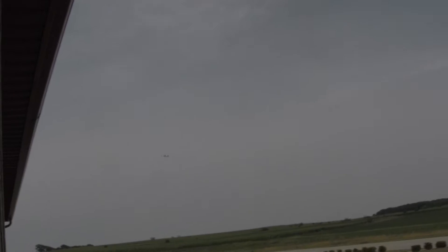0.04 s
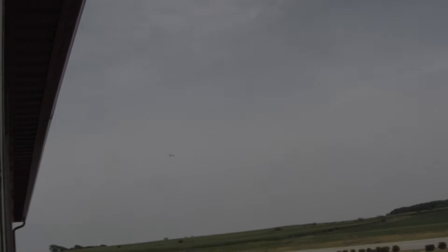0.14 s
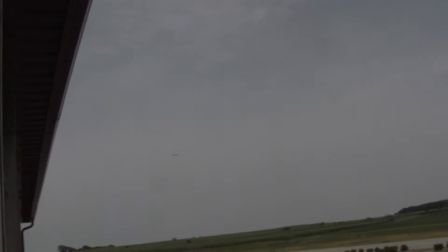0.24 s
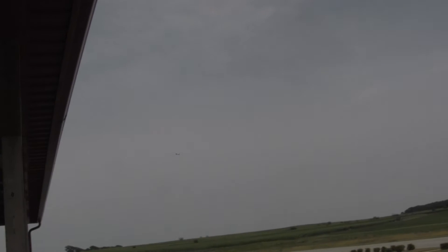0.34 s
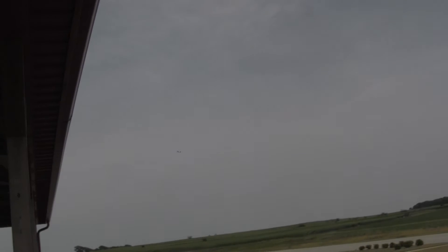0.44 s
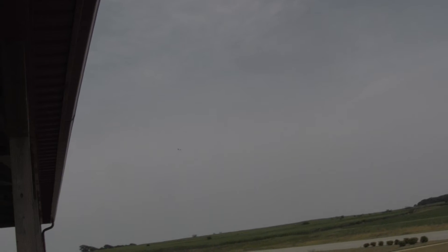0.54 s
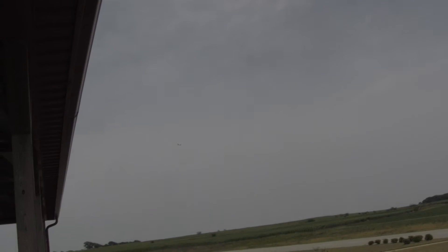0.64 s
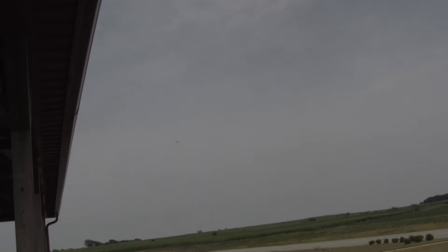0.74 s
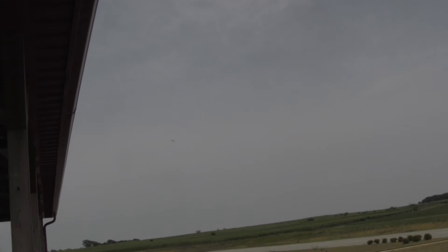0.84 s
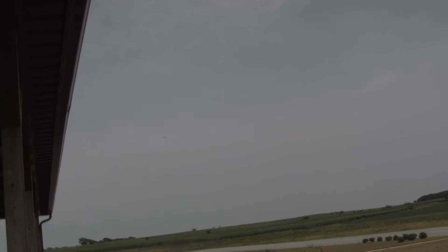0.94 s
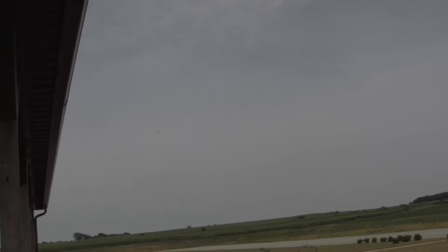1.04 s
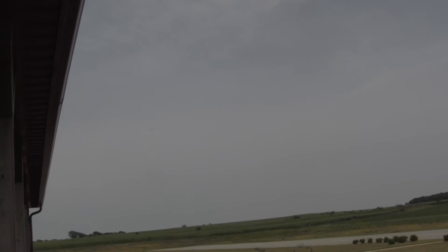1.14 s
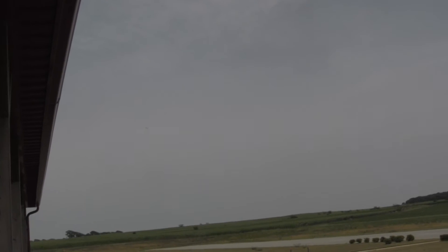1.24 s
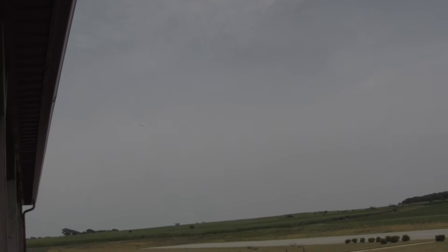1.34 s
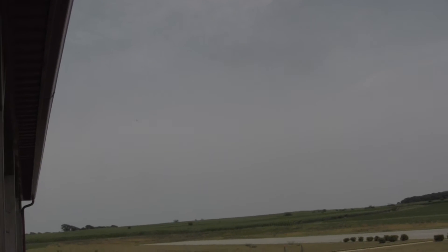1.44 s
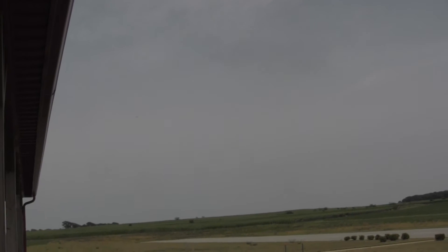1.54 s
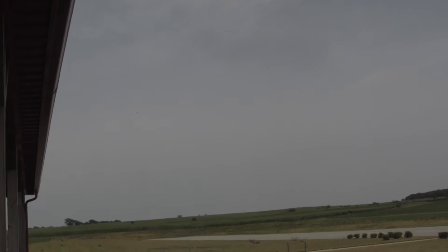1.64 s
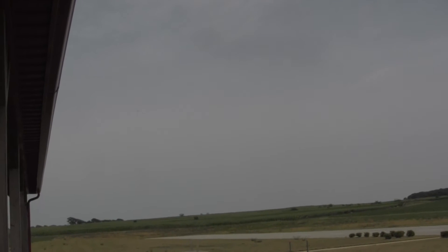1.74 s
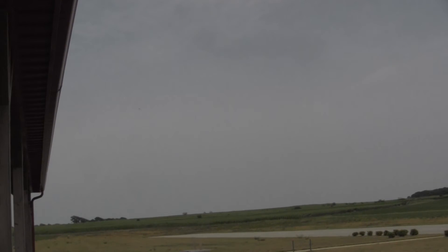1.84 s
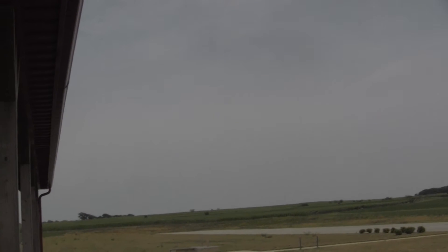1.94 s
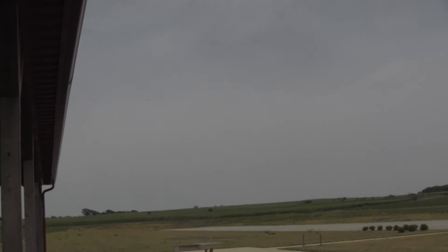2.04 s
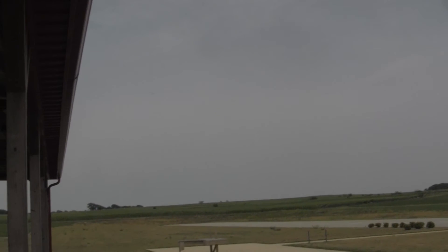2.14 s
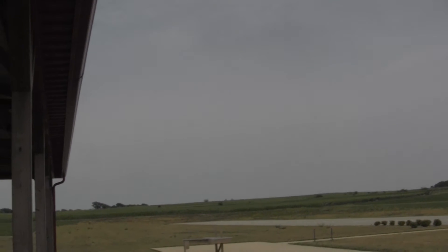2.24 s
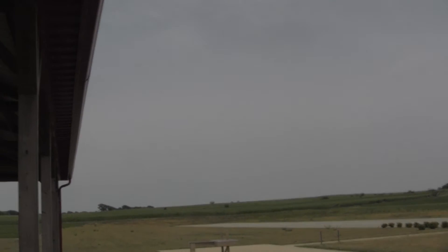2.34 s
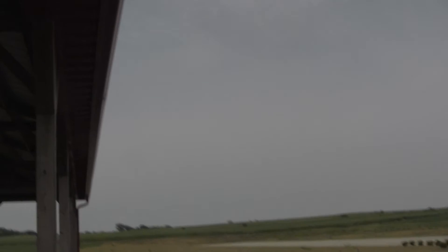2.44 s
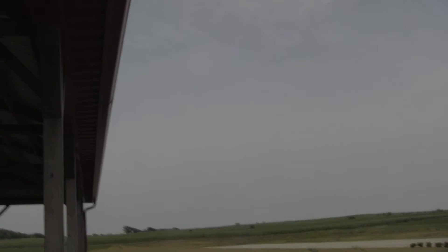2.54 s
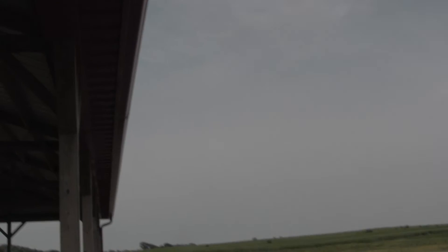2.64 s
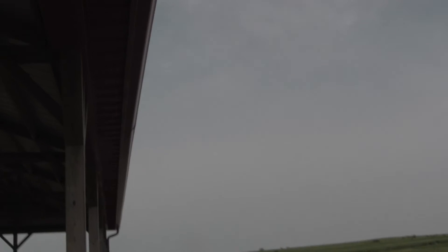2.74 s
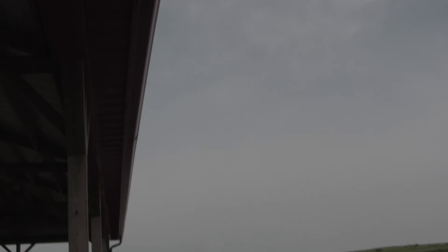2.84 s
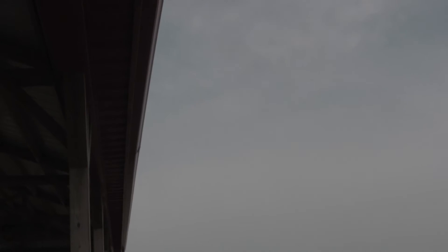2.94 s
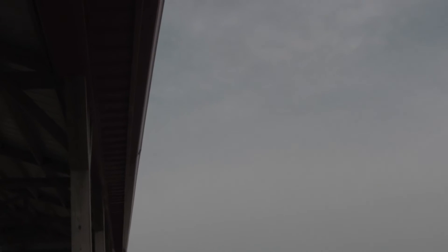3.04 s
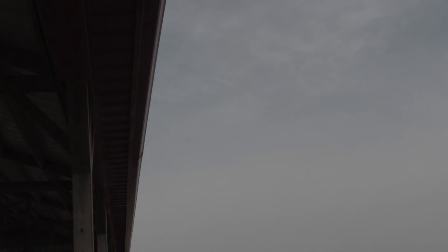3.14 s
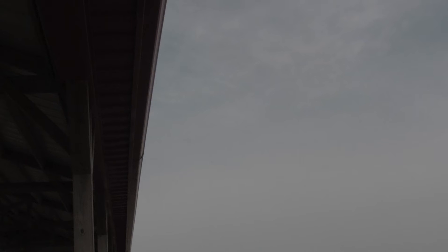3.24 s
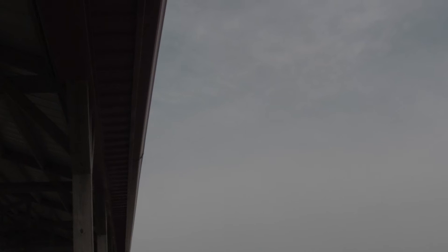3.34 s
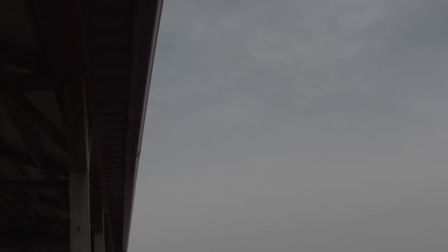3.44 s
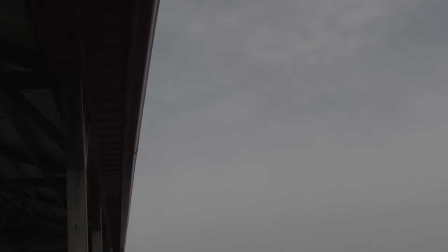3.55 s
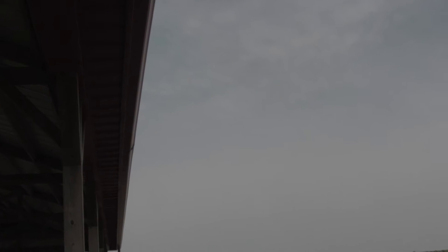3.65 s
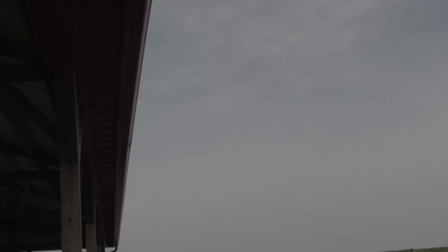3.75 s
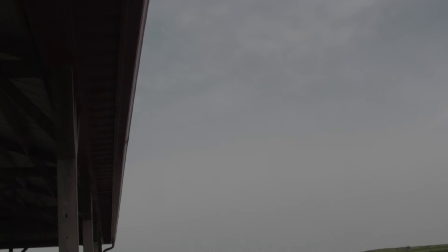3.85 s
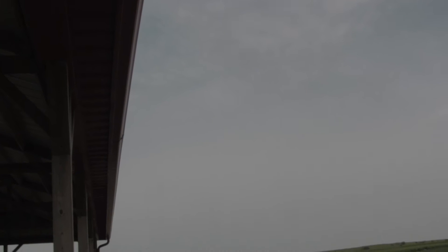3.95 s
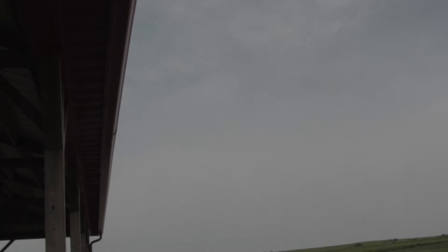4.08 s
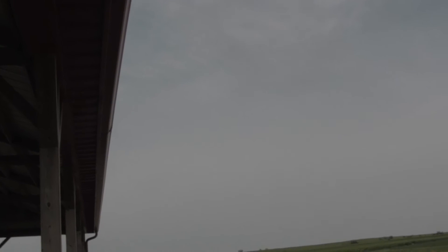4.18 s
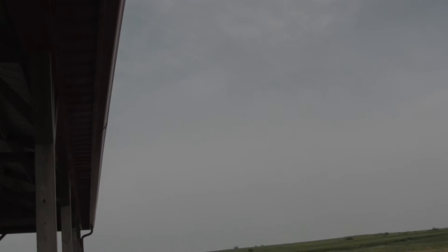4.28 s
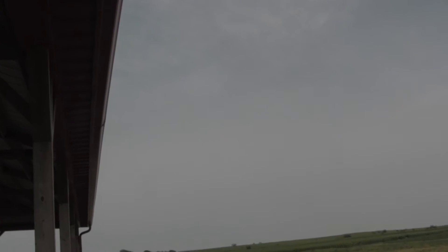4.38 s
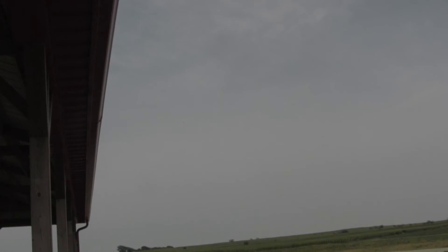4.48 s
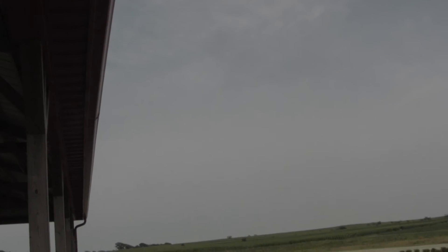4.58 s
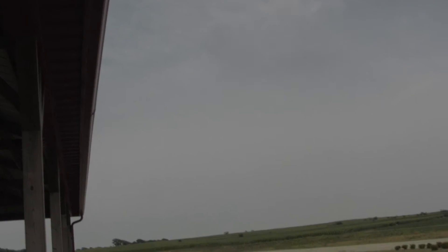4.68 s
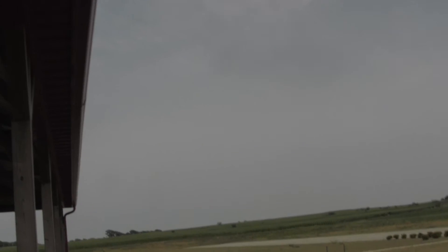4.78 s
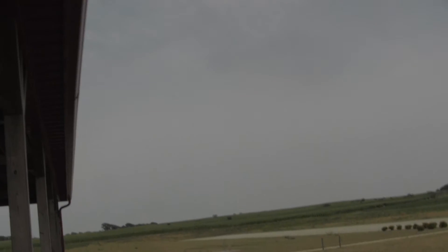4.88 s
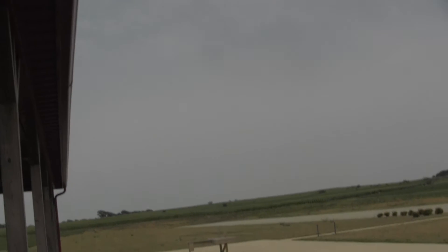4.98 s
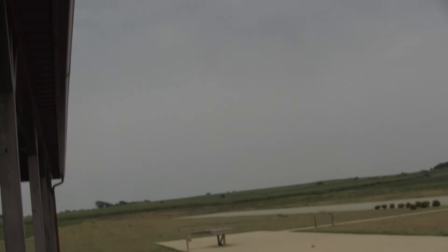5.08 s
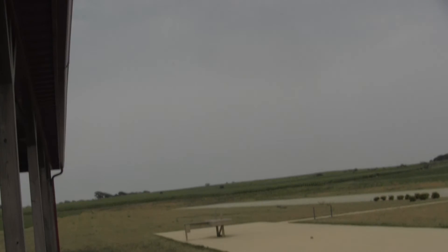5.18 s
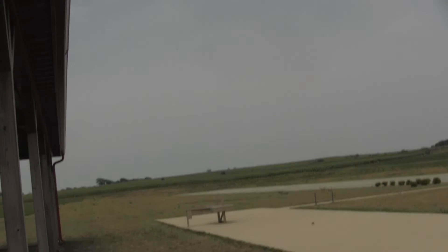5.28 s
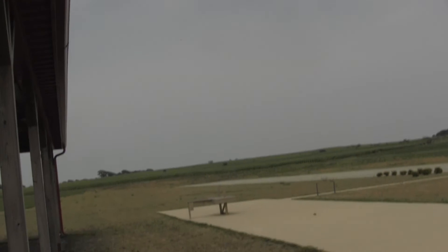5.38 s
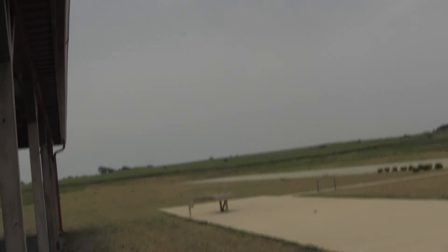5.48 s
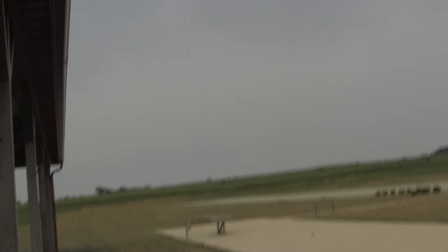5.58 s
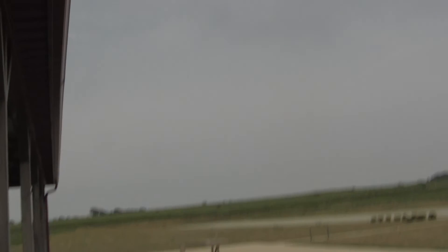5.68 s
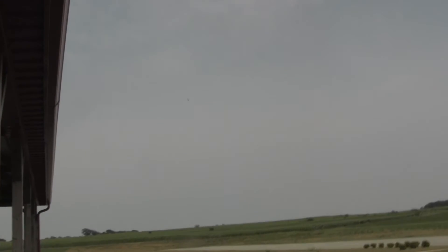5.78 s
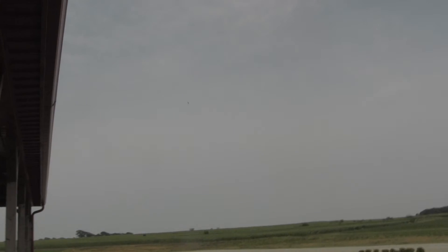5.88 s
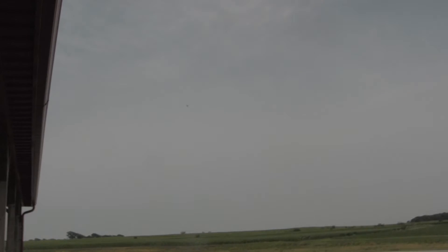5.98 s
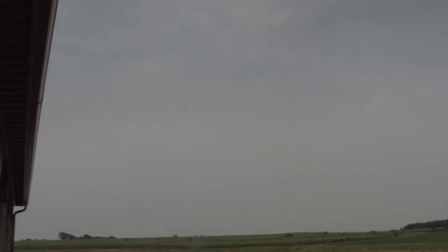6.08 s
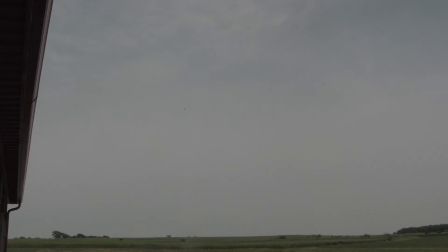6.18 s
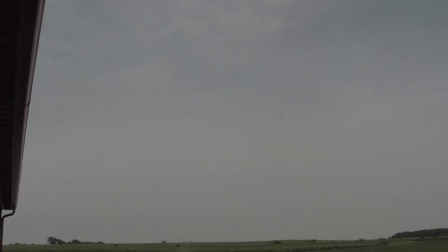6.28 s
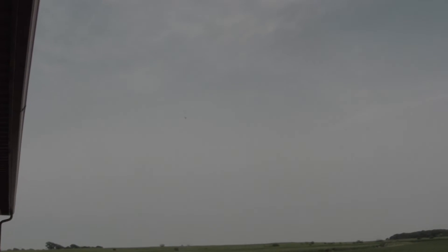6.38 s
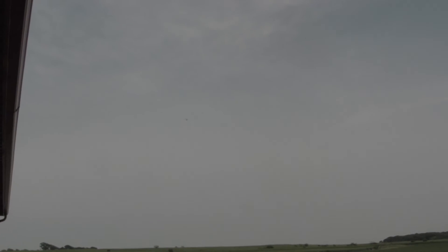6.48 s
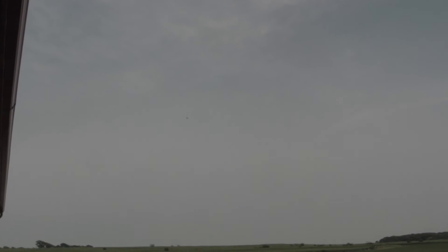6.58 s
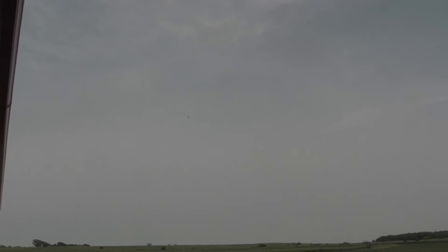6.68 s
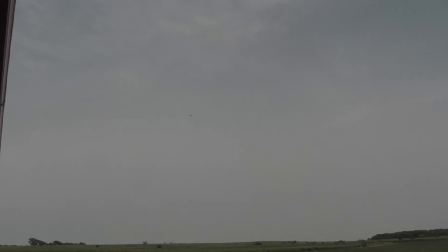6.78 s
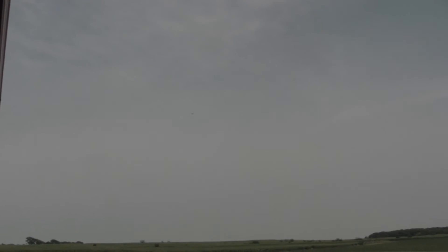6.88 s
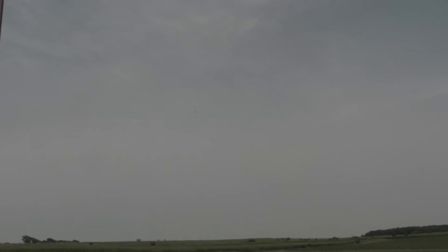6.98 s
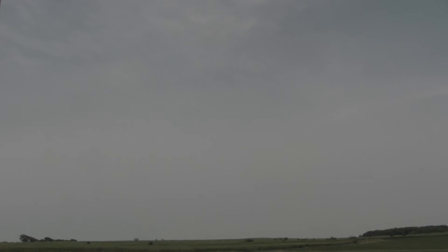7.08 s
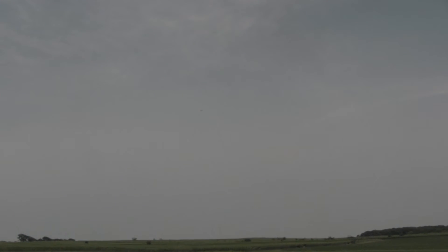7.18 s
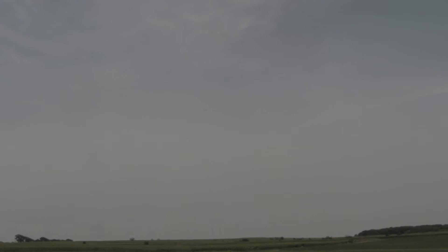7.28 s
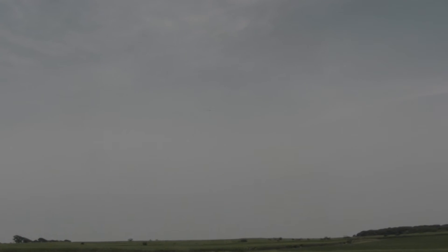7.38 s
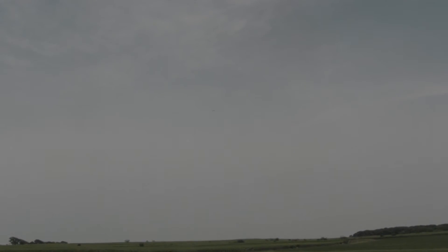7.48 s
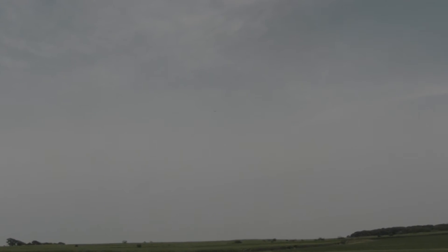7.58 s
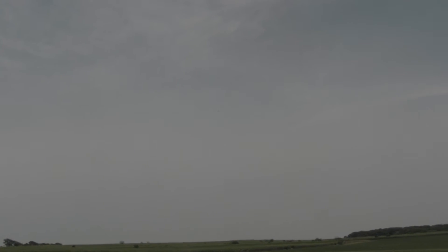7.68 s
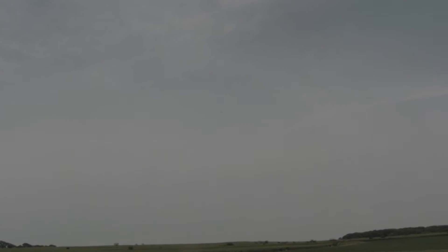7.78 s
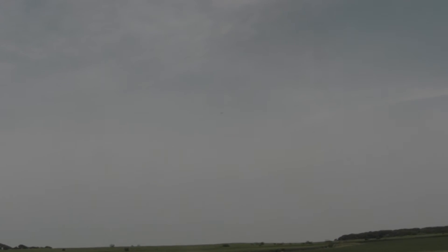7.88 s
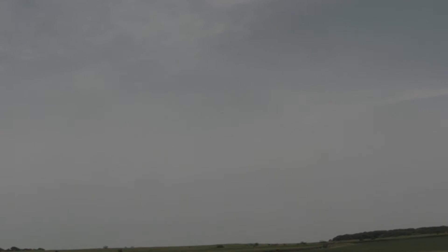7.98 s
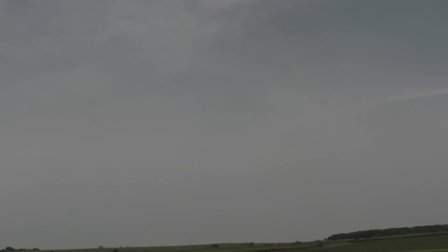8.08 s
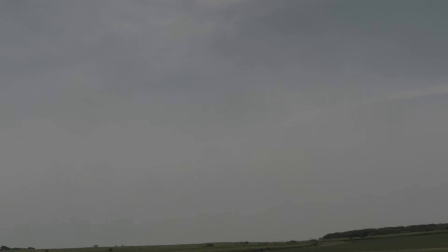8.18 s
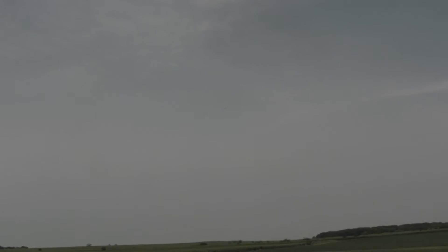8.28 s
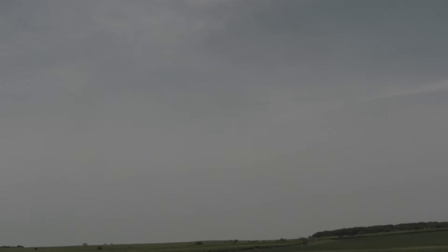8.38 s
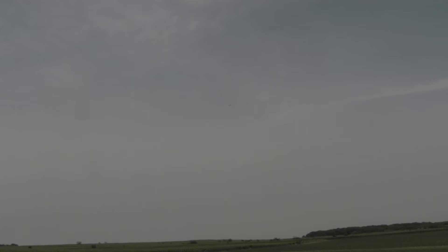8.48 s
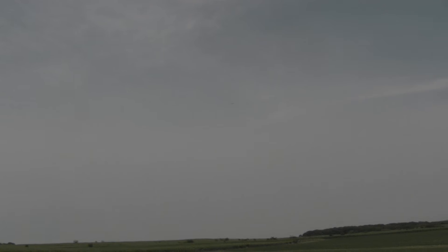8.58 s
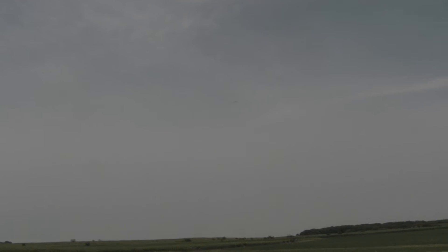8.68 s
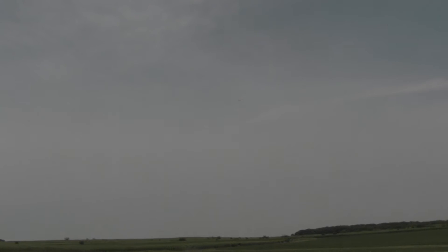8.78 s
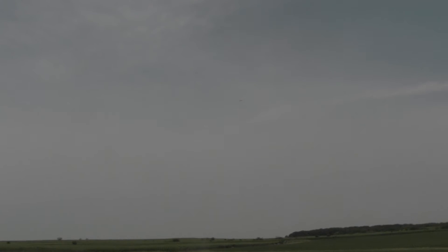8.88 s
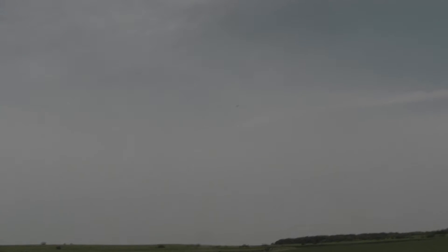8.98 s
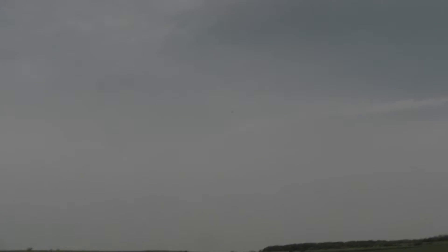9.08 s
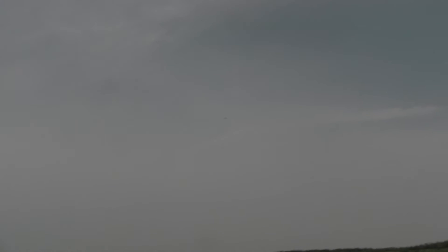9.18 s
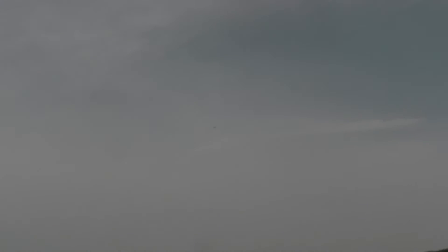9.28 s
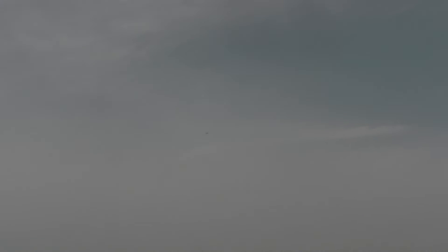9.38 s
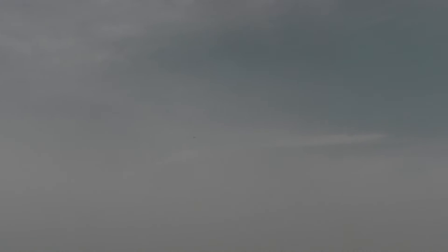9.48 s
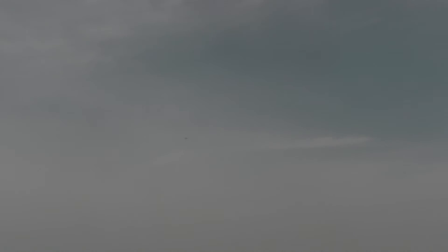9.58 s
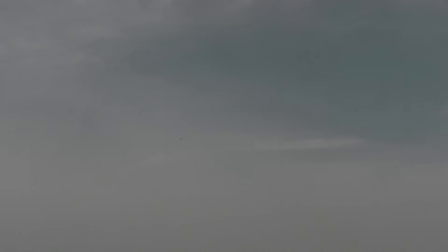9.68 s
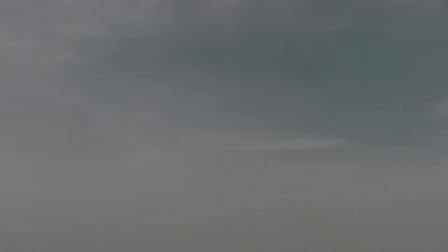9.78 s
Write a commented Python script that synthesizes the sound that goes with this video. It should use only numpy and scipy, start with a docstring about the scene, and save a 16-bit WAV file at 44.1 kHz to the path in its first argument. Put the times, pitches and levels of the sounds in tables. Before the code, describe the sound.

A model jet roars and whines close by, sinking in pitch as it recedes, while light wind buffets the microphone and faint camera ticks follow.

```python
"""A model jet climbs away over an airfield, heard from the edge of an open wooden shelter.
First its exhaust roars close by: noise through tailpipe resonances that sink, beside a whine that also sinks.
Wind eddies, made as short noise and vortex knocks, buffet the microphone; moving air swells and dips the treble.
From halfway, dry noise ticks come from the hand-held camera amid thin patches of grainy hiss; the fading whine
climbs with the throttle over a lower shaft tone, and the image opens to the right. A faint hiss runs throughout."""
import sys
import numpy as np
from scipy import signal
from scipy.fft import rfft, irfft, next_fast_len
from scipy.io import wavfile

SR = 44100
rng = np.random.default_rng(int(sys.argv[2]) if len(sys.argv) > 2 else 0)


def to_wav(sig):
    """Store sig (one row per channel, or 1-D mono) as 16-bit WAV at the path in sys.argv[1].

    Samples outside -1..1 are clipped; the rate is SR.
    """
    pcm = np.clip(np.atleast_2d(sig), -1, 1) * 32767
    pcm = np.round(pcm).astype(np.int16)
    wavfile.write(sys.argv[1], SR, pcm.T)  # frames by channels


N = 433503  # samples
CUTOFF_HZ = 15300
FRAME, HOP = 1024, 256  # short-time analysis, samples
TIME = np.arange(N) / SR
FRAME_S = np.arange(N // HOP + 2) * HOP / SR
BIN_HZ = np.maximum(np.arange(FRAME // 2 + 1) * SR / FRAME, 1)[:, None]
ABSORBED_ABOVE_HZ = 1640
NEAR_UNTIL_S, NEAR_FADE_S = 0.5, 0.79

# Breeze on the microphone. Each row: time in seconds, level in dB.
BREEZE_LEVEL = [(0, -41), (.45, -52), (.9, -54), (1.5, -72), (2.22, -50.5), (2.45, -68), (3.0, -66.5),
                (3.35, -61), (4.4, -60), (4.82, -46.5), (5.3, -67.5), (5.95, -48), (6.25, -58.5),
                (8.05, -53.5), (8.55, -51), (8.9, -61), (9.33, -47.5), (9.83, -51)]
# Spectrum of the breeze. Each row: frequency in Hz, relative level in dB.
BREEZE_COLOUR = [(20, -34), (45, -17), (70, -5), (110, 0.5), (180, 0.5), (280, -7.5), (450, -32),
                 (800, -30), (2000, -65)]
# Single eddies. Each row: middle in seconds, length in seconds, rms in dB before the last high-pass.
BUFFETS = [(.01, 0.036, -33), (0.165, 0.027, -34), (0.235, 0.045, -23.5), (0.411, 0.039, -34),
           (1.187, 0.0363, -42), (2.284, 0.022, -41), (3.434, 0.014, -38.5), (4.033, 0.037, -46),
           (4.565, 0.0095, -34), (4.58, 0.016, -34), (4.668, 0.024, -45), (4.694, .013, -37),
           (4.708, 0.009, -34), (4.718, 0.014, -30), (4.747, 0.0084, -29.5), (4.832, 0.0079, -28),
           (4.844, .014, -32), (4.893, 0.012, -44), (5.744, 0.036, -42.5), (5.841, 0.011, -33.5),
           (5.871, 0.031, -38.5), (6.094, 0.02, -35), (6.12, 0.018, -35.5), (7.47, 0.027, -46),
           (8.111, 0.026, -47), (8.255, 0.022, -45), (8.422, 0.024, -42), (8.699, 0.016, -39.5),
           (8.929, 0.013, -41), (9.193, 0.019, -42.5), (9.429, 0.16, -48.5), (9.524, 0.018, -37)]
# Gusts, short or long, shedding vortices. Each row: middle in seconds, length in seconds,
# vortices per second, top of the band in Hz, rms in dB before the last low-pass.
SHUDDERS = [(4.815, 0.026, 250, 510, -28.5), (5.82, .16, 170, 320, -48), (6.03, .23, 170, 320, -42.5),
            (8.531, 0.3, 207, 362, -47.5)]
# Ticks of the camera body. Each row: start in seconds, nominal level in dB.
TICKS = [(4.545, -39), (4.587, -37), (4.91, -46), (5.315, -47), (5.392, -43), (5.465, -42), (5.5, -42),
         (5.566, -42), (5.598, -35), (5.62, -39), (5.63, -42), (5.655, -47), (5.71, -48), (6.66, -38)]
# Faint, thin patches of grainy high hiss.
# Each row: middle in seconds, spread in seconds, rms at the crest in dB.
HISS_PATCHES = [(4.9, .015, -63), (5.47, 0.045, -58), (5.63, .04, -66), (6.05, .14, -65),
                (6.65, 0.027, -59.5)]
# Stereo image: mono below a corner, leaning right above it.
# Each row: time in seconds, corner in Hz, extra width in the low mids from 0 to 1.
STEREO_SPREAD = [(.5, 1900, 0.55), (.7, 4520, 0), (2.4, 4240, 0), (3.1, 2600, 0.1), (4.6, 1450, 0.14),
                 (5.9, 1400, 0.14), (6.4, 1100, 0.33), (7.3, 710, 0.5), (7.8, 506, 0.57), (8.2, 335.2, 0.9),
                 (9.83, 232, .9)]
# Pitch of the compressor whine. Each row: time in seconds, frequency in Hz.
WHINE_PITCH = [(0, 11165), (.55, 11100), (.75, 11050), (1.1, 10825), (1.3, 10620), (1.5, 10380),
               (1.7, 10200), (2.05, 9860), (2.5, 9365), (2.8, 9130), (3.1, 9020), (3.55, 8885),
               (5.27, 8900), (5.7, 9194), (5.9, 9323), (6.3, 9453), (6.9, 9485), (8.2, 9812), (9.83, 10627)]
# The whine beams forwards and fades as the jet turns.
# Each row: time in seconds, level in dB before swells, fading and an overall offset.
WHINE_LEVEL = [(0, -39), (.35, -47), (.68, -35), (.9, -45), (1.05, -41), (1.16, -57), (1.45, -46),
               (1.62, -50.5), (1.71, -59), (1.8, -47), (1.92, -54), (2.3, -57), (2.5, -50.5), (2.7, -54),
               (2.92, -60), (3.35, -65), (4.2, -72), (4.7, -71.5), (5.3, -80), (5.7, -75), (5.9, -81),
               (6.15, -74), (6.5, -67), (7.1, -87), (9.83, -101)]
# Moving air bends the sound towards the listener or away. Each row: middle in seconds, spread in seconds,
# centre in Hz, spread in octaves, change in dB.
SWELLS = [(.1, 0.019, 10000, 0.44, 4.5), (.73, 0.066, 7760, 0.37, 7.5), (1.07, 0.05, 7300, 0.42, 3.5),
          (1.18, 0.044, 7000, 1, -3), (1.53, 0.06, 6750, 0.84, 5.5), (.68, 0.15, 5850, .04, -3),
          (1.66, 0.061, 7000, 0.2, 4), (1.8, .08, 2800, .12, 6), (2.08, 0.075, 10000, .25, 5),
          (2.5, 0.19, 9300, 0.22, 3), (3.6, 0.63, 3840, 0.033, -7), (3.95, .45, 6330, .04, -2),
          (1.9, 0.2, 3480, 0.07, 5), (1.88, 0.11, 3130, 0.33, 1.5), (2.06, 0.076, 6240, 0.82, 4.5),
          (2.6, .25, 2850, .05, -8), (2.97, 0.1, 9350, 0.19, 14.5), (2.95, .08, 2480, 0.11, 6),
          (3.7, 0.24, 5000, 0.52, 9.5), (4.2, 0.15, 5270, 0.33, 7.5), (4.58, 0.12, 7000, 0.1, -5),
          (5.1, 0.15, 2000, 0.27, 6.5), (5.12, .13, 2030, .06, 2.5), (6.98, 0.045, 2520, .08, 4),
          (9.0, 0.84, 1970, .06, -2.5), (9.7, 0.14, 2580, 0.066, 4), (8.2, .6, 4570, .02, 3.5),
          (5.21, 0.096, 3480, 0.36, -4.5), (5.85, 0.12, 4070, 0.51, -6.5), (6.31, 0.1, 4900, 1.08, 10),
          (6.31, .07, 3170, 0.1, -0.5), (6.1, 0.049, 7000, .3, -7.5), (6.4, .4, 2680, 0.085, -7),
          (6.5, 0.072, 2060, 0.5, -4), (6.68, 0.04, 3180, 0.13, 12.5), (6.78, 0.042, 3500, 1.1, 5),
          (7.02, 0.037, 3500, 0.42, -3.5), (7.15, 0.023, 6000, 1.3, 4.5), (7.25, 0.034, 1840, 0.33, 7),
          (7.38, .03, 3300, .5, 0.5), (7.66, 0.094, 6000, 0.93, 10), (7.79, 0.033, 3270, .5, -2.5),
          (8.025, 0.056, 5000, 1.2, 13.5), (8.145, 0.028, 3800, 0.86, 9), (8.32, 0.041, 4500, 0.51, 3.5),
          (8.62, 0.015, 6500, 0.75, 10), (8.76, 0.048, 5970, 1.3, 9), (9.1, 0.087, 6000, .6, 4),
          (9.31, .02, 5000, .8, -3), (9.37, .018, 6500, 0.45, 0), (9.42, .015, 6500, .5, -7),
          (9.55, 0.12, 4460, 0.82, 6), (9.77, .025, 6500, 0.45, -5)]
# Further swells and dips of single bands, made the same way as those above. Each row: middle in seconds, spread
# in seconds, centre in Hz, spread in octaves, change in dB.
BLOOMS = [(.8, .25, 2400, 0.032, -3), (0.59, .1, 2970, 0.036, 4.5), (0.7, 0.14, 5370, 0.029, 5),
          (1, 0.091, 5620, .03, 3), (1, .12, 3260, .025, 2), (1, 0.16, 2330, .04, 3),
          (1.32, 0.28, 418, 0.11, 6), (1.14, 0.11, 1235, .04, 8), (5.3, 0.5, 1180, 0.046, 6),
          (6.85, 0.2, 2100, .06, 3.5), (7.8, 0.6, 840, 0.069, 7), (8.3, 0.23, 1050, 0.063, 5)]
# Far-carrying part of the exhaust, before colouring.
# Each row: time in seconds, rumble band level in dB, roar band level in dB.
ROAR = [(0, -31, -27.5), (1.2, -36.5, -26), (1.65, -41.5, -25.5), (2.0, -40, -26.5), (2.5, -43, -33.5),
        (3.1, -46.5, -37), (3.8, -48, -41.5), (5.0, -50.5, -45), (5.35, -50, -40), (6.6, -44, -37),
        (7.05, -47, -42), (7.7, -46.5, -43.5), (8.4, -52.5, -47.5), (9.0, -51, -42), (9.83, -51, -42.5)]
# Part of the exhaust that fades with distance, before colouring.
# Each row: time in seconds, rush band level in dB, absorption of the treble by the air in dB per kHz.
RUSH = [(0, -21, 0), (.45, -23.5, .5), (1.0, -21.5, 0.95), (1.25, -25.5, 0.3), (1.7, -29, 1),
        (2.3, -34, 1.53), (2.9, -35, 2.5), (3.2, -35.5, 3.5), (4.5, -46.5, 1.5), (5.45, -46, 2),
        (6.0, -36, 3), (7.4, -45.5, 2.5), (8.3, -43, 2.5), (8.9, -41, 3), (9.83, -45, 3)]
# Bands of rumble, roar and rush. Each row: low edge in Hz, high edge in Hz.
BANDS = [(300, 560), (560, 1300), (1300, 2700)]
# Treble of the plume before the air absorbs it. Each row: frequency in Hz, relative level in dB.
TREBLE = [(1870, -0.5), (3450, -3.5), (5740, -6.5), (8870, -12.5), (13000, -25.5)]
# Tailpipe resonances as they arrive. Each row: time in seconds, spacing in Hz, nominal depth in dB.
PIPE = [(0, 548, 3.5), (.4, 535, 3.5), (.75, 495, 4), (1.05, 485, 3), (1.45, 467.6, 5), (2, 452, 2.5),
        (2.35, 429, 6.5), (2.6, 427, 4), (3, 430, 3.5), (3.8, 425.5, 2), (4.6, 421, 3), (5.2, 423, 4),
        (5.7, 404, 5.5), (6.3, 405, 1.5), (6.9, 397, 5.5), (7.6, 398.5, 6), (8.3, 400, 6), (8.7, 408, 6.5),
        (9.2, 392, 2.5), (9.83, 401, 7)]
# Aspect of the jet. Each row: time in seconds, share of direct sound from 0 to 1,
# hoot of the second resonance in dB, howl of the fourth in dB.
ASPECT = [(0, 0.65, 8, 4.5), (.5, 0.66, 7, 7), (.9, 0.71, 7, -3.5), (1.6, 0.75, 1.5, -6),
          (2.4, 0.091, 4.5, 0), (3.3, 0, 4.5, -2.5), (4.9, 0, 7.5, 3), (5.7, 0.47, 6.5, -4),
          (6.2, 0.085, 3, -1.5), (7.3, 0.27, 3.5, 2.5), (8.3, 0.29, -2, -3.5), (9.83, 0, -4.5, 0)]
# Uneven lowest resonances. Each row: multiple of the spacing, width in multiples, change in dB.
EXHAUST = [(.92, .16, 4), (1.22, .13, -5.5), (2.0, .13, 2.5), (2.38, .11, -5.5), (2.72, .13, 0.5),
           (3.1, .13, -6), (3.5, .15, 2.5)]
# Further peaks and notches while the jet is close.
# Each row: multiple of the spacing, width in multiples, change in dB.
NEAR = [(1.12, .07, -3.5), (1.3, .07, 6), (2.27, .08, -4), (2.72, .14, -2.5), (3.13, .12, 11.5),
        (3.43, .08, -10), (4.55, .2, 4)]
# Roof and floor of the shelter, at full strength. Each row: centre in Hz, width in Hz, change in dB.
SHELTER = [(345, 190, 1), (534, 28, -7), (735, 63, 0), (1375, 94, -1), (1722, 129, -7), (1966, 98, 3.5),
           (2240, 105, 1.5), (2720, 140, -2.5), (3190, 306, 5), (3940, 69, 3), (4290, 250, -3.5),
           (5740, 450, 1.5), (6420, 145, -7), (7200, 270, 1)]
# Swish of the ground echo. Each row: time in seconds, crest in Hz, height in dB.
SWISH = [(.5, 6000, 0.5), (.8, 5470, 0.5), (1.3, 4370, -1.5), (2.0, 3780, 3.5), (2.6, 3620, 1.5),
         (3.7, 4940, 0), (4.5, 4270, 7), (4.85, 4030, 8), (5.12, 3450, 6.5), (5.45, 3330, 2.5),
         (5.7, 2830, 4.5), (6.1, 3100, -3.5), (6.3, 3330, 3.5), (6.72, 3170, 0), (6.95, 2430, 4.5),
         (7.5, 2055, 3)]
# Overall colour of the jet. Each row: frequency in Hz, relative level in dB.
COLOUR = [(30, -56), (100, -25), (200, -19), (260, -7.5), (330, 0), (900, -1), (2000, -0.5), (3500, -1.5),
          (6000, 1), (9000, 0.5), (11000, 2.5), (13000, -2.5), (15500, -19)]
# Diffuse sound relative to direct. Each row: frequency in Hz, level in dB.
DIFFUSE = [(100, -86), (700, -97), (2000, -22.5), (5000, -11), (10000, -15), (14000, -13)]


def from_db(db):
    """The decibel law: 20 dB is a tenfold amplitude."""
    return 10 ** (np.asarray(db) / 20)


def rms_one(x):
    """Normalisation: the mean square becomes 1."""
    return x / np.sqrt(np.mean(x ** 2) + 1e-20)


def in_time(rows, at):
    """Linear interpolation of each column of a time curve."""
    s, *columns = np.transpose(rows)
    return [np.interp(at, s, column) for column in columns]


def at_hz(points, hz):
    """Interpolation of a spectrum on a logarithmic frequency axis."""
    point_hz, db = np.transpose(points)
    return np.interp(np.log(hz), np.log(point_hz), db)


def humps(rows, at):
    """Superposition of Gaussian peaks and notches."""
    return sum(height * np.exp(-.5 * ((at - centre) / width) ** 2) for centre, width, height in rows)


def coloured(gain_at):
    """Spectral shaping: white noise times a function of frequency, scaled to unit rms."""
    size = next_fast_len(N)
    hz = np.maximum(np.arange(size // 2 + 1) * SR / size, 1e-3)
    spectrum = rfft(rng.standard_normal(size)) * gain_at(hz)
    return rms_one(irfft(spectrum, size)[:N])


def drift(rate_hz):
    """Low-passed noise: a random fluctuation of unit rms, mostly slower than the rate."""
    return coloured(lambda hz: 1 / (1 + (hz / rate_hz) ** 4))


def to_frames(x):
    """Short-time Fourier analysis: samples to spectra."""
    padded = np.pad(x, (0, (len(FRAME_S) - 1) * HOP - len(x)))
    return signal.stft(padded, nperseg=FRAME, noverlap=FRAME - HOP)[2]


def noise_frames():
    """Short-time spectra of white noise with unit power per Hz."""
    return to_frames(rng.standard_normal((len(FRAME_S) - 1) * HOP) * np.sqrt(SR / 2))


def to_sound(frames):
    """Fourier synthesis by overlapping frames: spectra to samples."""
    return signal.istft(frames, nperseg=FRAME, noverlap=FRAME - HOP)[1][..., :N]


def filtered(x, order, edge_hz, kind):
    """Butterworth filtering: a maximally flat passband."""
    return signal.sosfilt(signal.butter(order, edge_hz, kind, fs=SR, output="sos"), x)


def ports(left_minus_right_db):
    """Intensity panning: left and right gains whose mean is 1."""
    gains = from_db(np.array([left_minus_right_db, -left_minus_right_db]) / 2)
    return gains / gains.mean(axis=0)


def left_and_right(lean=0.38, low_mids_hz=1000, shade_db=-4.0, shade_hz=4000):
    """Mid-side imaging: a high-passed side part leans right and the left port's treble is shaded."""
    corner_hz, extra = in_time(STEREO_SPREAD, FRAME_S)
    high_pass = 1 / (1 - 1j * corner_hz / BIN_HZ)
    low_mids = extra / (1 + 1j * BIN_HZ / low_mids_hz)
    side = high_pass ** 2 * (lean + low_mids)
    shade = from_db(shade_db / (1 + (shade_hz / BIN_HZ) ** 2))
    gains = np.array([(1 - side) * shade, 1 + side])
    return gains / gains.mean(axis=0)


def self_noise(level_db=-64.5):
    """Microphone self-noise: white hiss, independent in each channel."""
    return from_db(level_db) * rng.standard_normal((2, N))


def breeze(lump_db=3.5, lump_rate_hz=14.0):
    """Turbulent pressure: eddies on the ports make a low, lumpy rumble."""
    lumps = from_db(lump_db * drift(lump_rate_hz))
    rumble = coloured(lambda hz: from_db(at_hz(BREEZE_COLOUR, hz))) * lumps
    return from_db(in_time(BREEZE_LEVEL, TIME)[0]) * rms_one(rumble)


def buffets(low_hz=135, top_hz=340, doubling_db=20.5, usual_db=-29.5, rolloff_hz=75):
    """Eddy impact: single band-limited thuds, whose band reaches higher when they are harder."""
    out = np.zeros(N)
    for middle_s, length_s, db in BUFFETS:
        size = max(int(length_s * SR), 64)
        harder_top_hz = top_hz * 2 ** ((db - usual_db) / doubling_db)
        top = np.clip(harder_top_hz, 1.74 * low_hz, SR / 10)
        eddy = filtered(rng.standard_normal(SR // 2), 2, [low_hz, top], "band")
        puff = rms_one(eddy[-size:] * signal.windows.tukey(size, .8))  # the settled end of the noise
        start = max(int(middle_s * SR) - size // 2, 0)
        out[start:start + size] += from_db(db) * puff
    return filtered(out, 2, rolloff_hz, "high")


def shudders(low_hz=140, jitter=0.19, strength_scatter_db=3.0, soften_hz=1150):
    """Vortex shedding: some gusts, short or long, shed an uneven run of vortices that knock on the diaphragm."""
    out = np.zeros(N)
    for middle_s, length_s, shedding_hz, top_hz, db in SHUDDERS:
        size = int(length_s * SR)
        slip, strength = rng.standard_normal((2, 200))
        # jitter is a share of the shedding period
        periods = np.arange(len(slip)) + .5 + jitter * slip
        at = (SR / shedding_hz * periods).astype(int)
        inside = (at >= 0) & (at < size)
        at, strength = at[inside], strength[inside]
        knocks = np.zeros(size + SR // 20)  # room for the filter to ring out
        knocks[at] = from_db(strength_scatter_db * strength) * signal.windows.tukey(size, .5)[at]
        body = filtered(knocks, 2, [low_hz, max(top_hz, 2 * low_hz)], "band")
        start = int(middle_s * SR) - size // 2
        # the rms refers to the gust without its ring-out
        out[start:start + len(body)] += from_db(db) * rms_one(body) * np.sqrt(len(body) / size)
    return filtered(out, 2, soften_hz, "low")


def wind():
    """Superposition: breeze, buffets and shudders share the stereo image of the jet."""
    return to_sound(to_frames(breeze() + buffets() + shudders()) * left_and_right())


def ticks(decay_s=0.0011, low_hz=7000):
    """Damped impact: each plastic tick is a tiny, dry burst of noise that dies exponentially."""
    out, age = np.zeros(N), TIME[:SR // 20]
    for s, db in TICKS:
        start = int(s * SR)
        burst = np.exp(-age / decay_s) * rng.standard_normal(len(age)) / 2
        out[start:start + len(age)] += from_db(db) * burst
    return filtered(out, 2, low_hz, "high")


def hiss_patches(low_hz=8500, grain_db=-1.0, grain_rate_hz=250.0):
    """Amplitude modulation: high-passed noise with a random grain swells into faint, thin patches."""
    grains = rng.standard_normal(N) * from_db(grain_db * drift(grain_rate_hz))
    hiss = filtered(grains, 2, low_hz, "high")
    patches = [(s, spread_s, from_db(db)) for s, spread_s, db in HISS_PATCHES]
    return humps(patches, TIME) * rms_one(hiss)


def swells_db(hz, at):
    """Refraction by moving air: each swell or dip is a smooth bell in time and in pitch."""
    total_db = 0
    for s, spread_s, centre_hz, octaves, db in SWELLS + BLOOMS:
        in_pitch = humps([(0.0095, octaves, 1)], np.log2(hz / centre_hz))
        total_db = total_db + humps([(s, spread_s, db)], at) * in_pitch
    return total_db


def shaft(level_db=-59.0, waver=0.00207, start_s=5.5, full_s=7.0, swell_share=0.96, order=3):
    """Subharmonic of rotation: at high throttle a tone at a third of the blade tone flares in the swells."""
    hz = in_time(WHINE_PITCH, TIME)[0] / order * (1 + waver * drift(35))
    frame_hz = in_time(WHINE_PITCH, FRAME_S)[0] / order
    swell_db = np.interp(TIME, FRAME_S, swells_db(frame_hz, FRAME_S))
    throttle = np.interp(TIME, [start_s, full_s], [0, 1])
    gain = from_db(level_db + swell_share * swell_db + 3.2 * drift(9)) * throttle
    return gain * np.sin(2 * np.pi * np.cumsum(hz) / SR)


def whine(level_db=-2.0, waver=0.00071, scatter=0.24, scatter_hz=45, fading_db=2.1, pan_db=-12.5):
    """Blade-passing tone with scattering: a line and a narrow skirt ride the same swells as the roar."""
    hz, = in_time(WHINE_PITCH, TIME)
    phase = 2 * np.pi * np.cumsum(hz * (1 + waver * drift(12.1))) / SR
    # two independent drifts, in phase and in quadrature, make the skirt
    tone = np.sin(phase) * (1 + scatter * drift(scatter_hz)) + np.cos(phase) * scatter * drift(scatter_hz)
    frame_hz, = in_time(WHINE_PITCH, FRAME_S)
    swell_db = np.interp(TIME, FRAME_S, swells_db(frame_hz, FRAME_S))
    db = level_db + in_time(WHINE_LEVEL, TIME)[0] + swell_db + fading_db * drift(9.3)
    return from_db(db) * rms_one(tone) * ports(pan_db)[:, None]


def mixing_noise_db():
    """Turbulent mixing and air absorption: smooth spectrum of the plume as it arrives, dB per Hz."""
    low, high = np.transpose(BANDS)
    rush_db, absorption = in_time(RUSH, FRAME_S)
    band_db = np.array(in_time(ROAR, FRAME_S) + [rush_db])
    density_db = band_db - 10 * np.log10(high - low)[:, None]
    # blend neighbouring bands between their geometric centres
    log_centres = np.log(low * high) / 2
    blend = [np.interp(np.log(BIN_HZ[:, 0]), log_centres, row) for row in np.eye(len(low))]
    absorbed_khz = np.maximum(BIN_HZ - ABSORBED_ABOVE_HZ, 0) / 1000
    plume_db = np.transpose(blend) @ density_db + at_hz(TREBLE, BIN_HZ)
    return plume_db - absorption * absorbed_khz + swells_db(BIN_HZ, FRAME_S)


def resonances_db(pipe_fade_hz=5200, even_above_hz=1800, end_shift=0.2, depth=1.05,
                  hoot_order=1.88, hoot_width=0.31, howl_order=3.72, howl_width=0.33):
    """Pipe resonance and Doppler shift: the tailpipe's modes move, the upper evenly; the shelter's stay."""
    direct, hoot_db, howl_db = in_time(ASPECT, FRAME_S)
    spacing_hz, depth_db = in_time(PIPE, FRAME_S)
    multiple = BIN_HZ / spacing_hz
    reach = 1 / (1 + (BIN_HZ / pipe_fade_hz) ** 2) / (1 + (even_above_hz / BIN_HZ) ** 6)
    comb = depth * depth_db * reach * np.cos(2 * np.pi * (multiple + end_shift))
    strongest = humps([(hoot_order, hoot_width, hoot_db), (howl_order, howl_width, howl_db)], multiple)
    closeness = np.clip(1 - (FRAME_S - NEAR_UNTIL_S) / NEAR_FADE_S, 0, 1)
    lowest = humps(EXHAUST, multiple) + closeness * humps(NEAR, multiple)
    shelter = (1 - direct) * humps(SHELTER, BIN_HZ)  # direct sound masks it
    return comb + strongest + lowest + shelter


def swish_db(width=0.14, notch_ratio=1.17, notch_share=0.46):
    """Interference: direct sound and ground echo add at a gliding crest and cancel just above it."""
    crest_hz, db = in_time(SWISH, FRAME_S)
    crest = (1, width, db)
    notch = (notch_ratio, width * notch_ratio, -notch_share * db)
    return humps([crest, notch], BIN_HZ / crest_hz)


def rafters(echo_db=-6.5, first_s=.0025, last_s=.009, stretch=0.9, above_hz=2000, count=24):
    """Multiple reflection: weak echoes from beams ripple the treble, with longer detours as the jet turns."""
    pipe_hz = in_time(PIPE, FRAME_S)[0]
    delays_s = first_s + (last_s - first_s) * (np.arange(count) + rng.random(count) / 2) / count
    grid_hz = np.arange(0, SR, 10)
    signs = rng.choice([-1, 1], count)
    echoes = np.exp(-2j * np.pi * grid_hz[:, None] * delays_s) @ signs / np.sqrt(count)
    reflected = from_db(echo_db) * grid_hz ** 2 / (grid_hz ** 2 + above_hz ** 2)
    ripple = np.abs(1 + reflected * echoes)
    # reading the ripple higher up acts like lengthening the delays
    lengthening = (pipe_hz[0] / pipe_hz) ** stretch
    return np.interp(BIN_HZ * lengthening, grid_hz, ripple)


def exhaust(flutter_db=0.7, flutter_rate_hz=15.0, flutter_hz=4000):
    """Source and filter: jet noise passes through the resonances and is shaken by turbulent air."""
    # the flutter reaches its stated spread at flutter_hz and grows with frequency
    shaking = np.interp(FRAME_S, TIME, drift(flutter_rate_hz))
    flutter = flutter_db * np.sqrt(BIN_HZ / flutter_hz) * shaking
    spectrum_db = mixing_noise_db() + resonances_db() + swish_db() + at_hz(COLOUR, BIN_HZ) + flutter
    gain = from_db(spectrum_db) * rafters()
    direct = noise_frames() * left_and_right()
    opposite_signs = np.array([1, -1])[:, None, None]
    diffuse = noise_frames() * from_db(at_hz(DIFFUSE, BIN_HZ)) * opposite_signs
    return to_sound(gain * (direct + diffuse))


def scene():
    """Superposition: hiss, wind, ticks and grainy patches, and the jet in the sky."""
    return self_noise() + wind() + ticks() + hiss_patches() + shaft() + whine() + exhaust()


def record(dry):
    """Band limitation: an elliptic low-pass cuts the top steeply."""
    return signal.sosfilt(signal.ellip(10, .2, 80, CUTOFF_HZ, fs=SR, output="sos"), dry)


dry = scene()
out = record(dry)
to_wav(out)
```